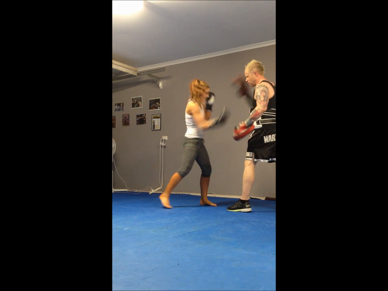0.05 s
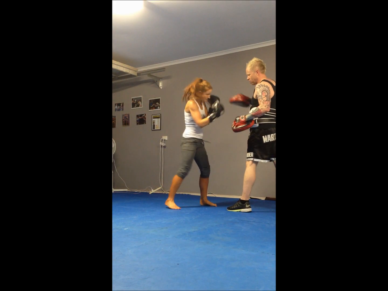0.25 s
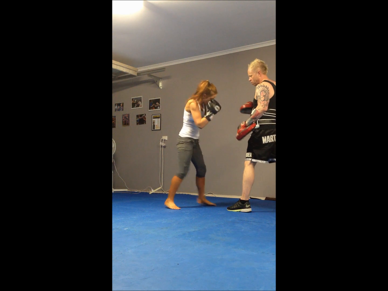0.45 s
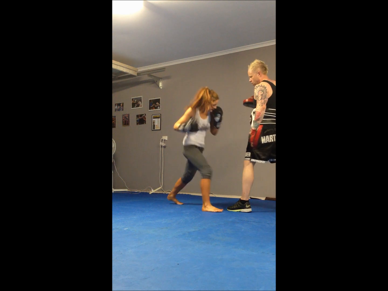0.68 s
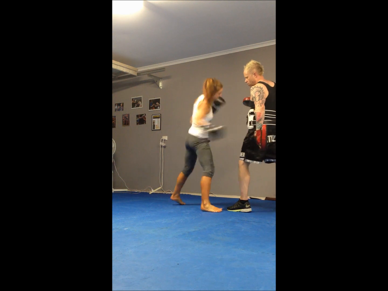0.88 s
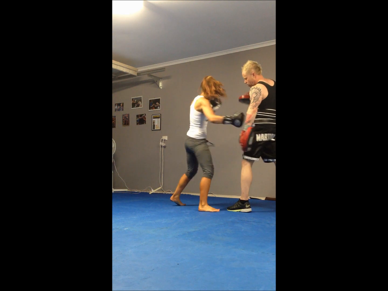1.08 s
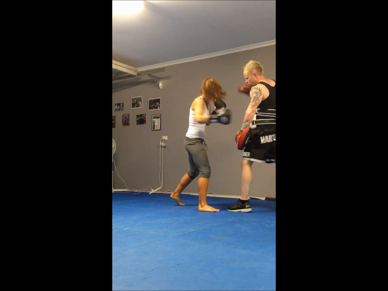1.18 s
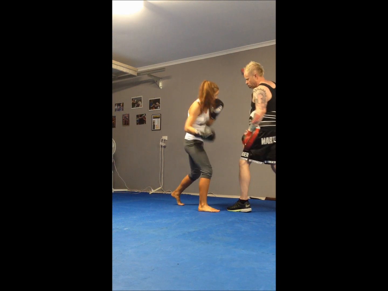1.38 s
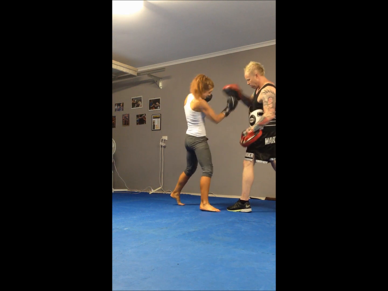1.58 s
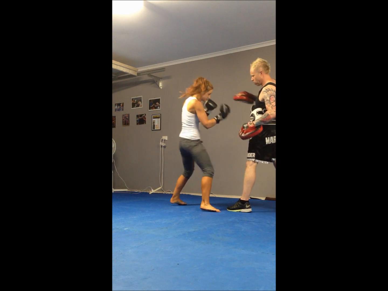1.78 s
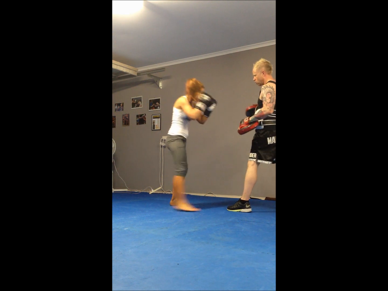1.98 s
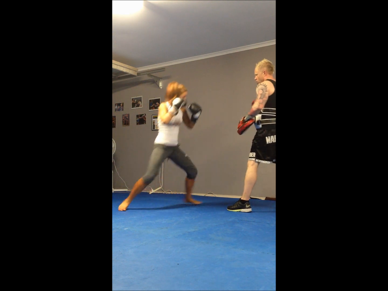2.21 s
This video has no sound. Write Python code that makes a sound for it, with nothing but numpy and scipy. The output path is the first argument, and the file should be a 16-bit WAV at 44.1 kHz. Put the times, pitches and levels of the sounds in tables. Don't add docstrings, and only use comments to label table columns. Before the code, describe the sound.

Boxing gloves smack focus mitts: a hard hit, a faint tap, a softer smack, then a sharp last one. Hard gym walls ring after each, over steady ventilation, caught by a small, slightly hissy phone microphone.

```python
import sys
import numpy as np
from scipy import signal
from scipy.io import wavfile
from scipy.ndimage import uniform_filter1d

SR = 44100
rng = np.random.default_rng(int(sys.argv[2]) if len(sys.argv) > 2 else 0)


def store_pcm(level_fs):
    pcm = np.round(np.clip(level_fs, -1, 1) * 32767).astype(np.int16)
    wavfile.write(sys.argv[1], SR, np.atleast_2d(pcm).T)


def how_loud(loudness_db):
    steps = np.asarray(loudness_db, float) / 20
    return 10 ** steps


N = 99225

# start_s, thud_db, slap_db, snap_db, crack_db
BLOWS = [
    (.2300, -18.5, -16.5, -19.5, -7),
    (.8126, -61, -43, -48, -44),
    (1.0841, -18.5, -24, -20.5, -19),
    (1.6969, -17.5, -21.5, -27, -7),
]
BLOW_HZ = [300, 1300, 3500, 9000]
SLAP_S = [.2301, .2361, .2385, .2445, .2520, .2650, .8127, .8200, .8310, 1.0838, 1.0874, 1.0917, 1.0993,
          1.1128, 1.1260, 1.6955, 1.6966, 1.6976, 1.6994, 1.7052]
# level_db, burst_s
SLAPS = [(0.5, 0.0018), (1.5, 0.00093), (-0.5, 0.0019), (-2, 0.0014), (-5, 0.00086), (-7, 0.0004),
         (2, 0.0027), (-2.5, 0.0039), (-4, 0.0051), (-4.5, 0.0019), (1, 0.0015), (-1.5, 0.00044),
         (-5, 0.00085), (-6.5, 0.0013), (-11, 0.00062), (0, 0.00068), (-.3, 0.0011), (-1, 0.0014),
         (-1, 0.003), (4, 0.00091)]
# pitch_hz, level_db, fade_s (time to fall 60 dB)
FOAM = [(215, 7, .06), (290, 6, .05), (370, 8, .05), (560, -1, .04), (810, -6, .03)]
TAILS = [(-11, -8, -4, -10, -12.5), (-34, -25, -35, -39, -33.5), (-9.5, -12.5, -13.5, -26.5, -22),
         (-11, -9.5, -14, -17.5, -16)]
TAIL_HZ = [400, 1000, 1700, 4400, 9000]


def blow(row, tail_db, boom_db):
    start_s, strengths_db = row[0], row[1:]
    sound = np.zeros(N)
    for slap_s, (level_db, burst_s) in zip(SLAP_S, SLAPS):
        if -.01 < slap_s - start_s < .1:
            add(sound, slap_s, slap(level_db, burst_s))
    add(sound, start_s, how_loud(-20.5) * dying_tones(FOAM, .2))

    def blow_tone(hz):
        lows_db = 4 * np.minimum(np.log2((hz + 10) / 204), 0)
        highs_db = -5.5 * np.maximum(np.log2((hz + 10) / 9000), 0)
        return read(list(zip(BLOW_HZ, strengths_db)), hz) + lows_db + highs_db

    sound = how_loud(17) * colour(sound, blow_tone)
    tail = colour(wall_returns(), lambda hz: read(list(zip(TAIL_HZ, tail_db)), hz))
    add(sound, start_s, how_loud(40) * tail)
    add(sound, start_s, boom(boom_db))
    return sound


def slap(level_db, burst_s):
    t = np.arange(600) / SR
    u = t / 0.0001
    push = -u * (2 - u) * np.exp(1 - u)
    fizz = rng.standard_normal(len(t)) * np.exp(-t / burst_s)
    return how_loud(level_db) * (how_loud(2) * push + how_loud(-2.5) * fizz)


# pitch_hz, width_hz, level_db, fade_s (time to fall 60 dB)
RINGS = [
    (968, 420, -39.5, 0.22),
    (1164, 130, -40, 0.37),
    (1464, 130, -47, 0.5),
    (4240, 1400, -25.5, 0.54),
    (1690, 180, -33.5, 0.62),
    (601, 260, -30, 0.77),
]
RING_S = [.8125, .8125, .8125, 1.7000, 1.0880, .2340]


def mitt_rings():
    mix = np.zeros(N)
    for (hz, width_hz, level_db, fade_s), start_s in zip(RINGS, RING_S):
        since = np.arange(N) / SR - start_s
        rise = np.clip(since / .002, 0, 1)
        fade = how_loud(-60 * np.maximum(since, 0) / fade_s)
        mix += how_loud(10) * hum(hz, width_hz, level_db) * rise * fade
    return mix


# pitch_a_hz, pitch_b_hz, fade_s (time to fall 60 dB)
ROOM_MODES = [(166, 250, 1), (214, 218, 0.61), (278.3, 297, 0.84), (359.6, 372, 0.47), (554, 664, 1)]
BOOMS = [(-31.5, -27.5, -25.5, -19.5, -27), (-65, -68, -63, -43, -45), (-32, -19, -25.5, -26, -33),
         (-27.5, -28.5, -25.5, -24.5, -36)]


def boom(boom_db):
    tones = []
    for (a_hz, b_hz, fade_s), level_db in zip(ROOM_MODES, boom_db):
        tones += [(a_hz, level_db, fade_s), (b_hz, level_db, fade_s)]
    rise_s = 0.0074
    return dying_tones(tones, 1)[:SR] * (1 - np.exp(-np.arange(SR) / SR / rise_s))


# pitch_hz, fade_s (time to fall 60 dB)
ROOM = [(80, 0.27), (170, 0.76), (400, 0.71), (1000, 0.43), (1800, 0.69), (4000, 0.6), (8000, 0.69),
        (14000, 0.3)]
# pitch_hz, level_db
EARLY = [(300, -43), (2000, -52), (4000, 1.5), (8000, 2), (14000, -2)]


def wall_returns():
    delay_s, rise_s, early_fade_s = .0012, 0.0042, 0.033

    def level_db(hz, s):
        late = how_loud(-60 * s / read(ROOM, hz))
        early = how_loud(read(EARLY, hz) - 60 * s / early_fade_s)
        return 10 * np.log10(late ** 2 + early ** 2)

    tail = cloud(SR, level_db, .6)
    since = np.maximum(np.arange(SR) / SR - delay_s, 0)
    return tail / np.linalg.norm(tail) * (1 - np.exp(-since / rise_s))


def room(x):
    return signal.fftconvolve(x, wall_returns())[:len(x)]


# start_s, length_s, level_db, brightness_db (per octave)
SLIDES = [
    (0.976, 0.2, -49, 11),
    (1.199, 0.22, -40, 12),
    (1.82, 0.34, -52, 3),
    (2.076, 0.12, -40, 4),
]


def feet():
    steps = np.zeros(N)
    for start_s, length_s, level_db, brightness_db in SLIDES:
        add(steps, start_s, slide(length_s, level_db, brightness_db))
    return steps + how_loud(-4) * room(steps)


def slide(length_s, level_db, brightness_db):
    top_hz, fall_db, peak = 8360, -8.5, 0.39
    u = np.linspace(0, 1, round(length_s * SR))
    hiss = rng.standard_normal(len(u))
    grain = evened(uniform_filter1d(rng.standard_normal(len(u)), size=60))
    hiss = hiss * how_loud(1.5 * grain)

    def skin_tone(hz):
        slope_db = np.where(hz < top_hz, brightness_db, fall_db)
        return slope_db * np.log2((hz + 1) / top_hz)

    swell = np.sin(np.pi * u ** (np.log(.5) / np.log(peak)))
    return how_loud(level_db + 18) * colour(hiss, skin_tone) * swell


# time_s, level_db
AIR = [(0, -40.5), (.18, -38), (.65, -42), (.95, -39), (1.45, -36.5), (1.65, -34.5), (2.0, -39),
       (2.25, -37.5)]
# pitch_hz, level_db
AIR_TONE = [(60, 2), (250, -7.5), (500, 1.5), (830, 1.5), (1100, -0.5), (1550, 3.1), (4200, -1.3),
            (9000, -8)]
# pitch_hz, width_hz, level_db
AIR_HUM = [(208, 23, -20), (256, 33, -18.5), (678, 127, -13.5), (827, 29, -12), (1371, 66, -14),
           (1575, 180, -9)]


def air():
    t = np.arange(N) / SR
    waver = np.zeros(N)
    for hz in np.geomspace(2, 20, 20):
        waver += np.sin(2 * np.pi * (hz * t + rng.random())) / np.sqrt(hz)
    wash = evened(cloud(N, lambda hz, s: read(AIR_TONE, hz) + 0 * s, 0.5))
    for row in AIR_HUM:
        wash = wash + hum(*row)
    return wash * how_loud(7 + np.interp(t, *np.transpose(AIR)) - 1.68 * evened(waver))


# pitch_hz, level_db
HISS = [(300, -51), (3000, -55), (8000, -46.5), (15000, -51)]


def microphone_hiss():
    return colour(rng.standard_normal(N), lambda hz: read(HISS, hz) + 10)


def hum(hz, width_hz, level_db):
    r = np.exp(-np.pi * width_hz / SR)
    slow = signal.lfilter([1], [1, -2 * r, r * r], rng.standard_normal((2, N)), axis=1)
    carrier = np.exp(2j * np.pi * hz * np.arange(N) / SR)
    return how_loud(level_db) * evened(((slow[0] + 1j * slow[1]) * carrier).real)


def dying_tones(tones, length_s):
    t = np.arange(0, length_s, 1 / SR)
    mix = np.zeros(len(t))
    for hz, level_db, fade_s in tones:
        pitch_hz = hz * rng.uniform(.995, 1.005)
        mix += how_loud(level_db - 60 * t / fade_s) * np.sin(2 * np.pi * pitch_hz * t)
    return mix


def cloud(size, db_at, patch_db):
    frames = size // 128 + 5
    hz = np.fft.rfftfreq(512, 1 / SR)[:, None]
    a, b, patches = rng.standard_normal((frames, 257, 3)).T
    patches = uniform_filter1d(patches, size=5, axis=0)
    patches = evened(uniform_filter1d(patches, size=16, axis=1))
    level_db = db_at(hz, np.arange(frames) * 128 / SR) + patch_db * patches
    return signal.istft((a + 1j * b) * how_loud(level_db), nperseg=512, noverlap=384)[1][:size]


def colour(x, db_at):
    log = np.log(how_loud(db_at(abs(np.fft.fftfreq(8192, 1 / SR)))))
    taps = np.fft.ifft(np.exp(log - 1j * signal.hilbert(log).imag)).real[:4096]
    return signal.oaconvolve(x, taps)[:len(x)]


def read(points, hz):
    f, value = np.transpose(points)
    return np.interp(np.log(hz + 1), np.log(f + 1), value)


def evened(x):
    return x / np.sqrt(np.mean(x ** 2) + 1e-20)


def add(mix, start_s, sound):
    part = mix[round(start_s * SR):][:len(sound)]
    part += sound[:len(part)]


def scene():
    blows = sum(map(blow, BLOWS, TAILS, BOOMS))
    return (blows + mitt_rings() + feet() + air() + microphone_hiss())[None]


def band_limit(x):
    return signal.sosfilt(signal.butter(12, 16460, fs=SR, output="sos"), x)


# pitch_hz, level_db
MIC_LOW = [(30, -33), (90, -24.5), (140, -10.5), (210, -3), (370, 0.95), (500, -4), (1050, -6.5),
           (1600, -6)]
# pitch_hz, level_db
MIC_HIGH = [(2000, -1.3), (4500, 2.68), (5100, -5.5), (6200, -3.5), (8200, 1.5), (9100, -5), (9900, -7.5),
            (15000, -9)]


def record(dry):
    x = colour(dry[0], lambda hz: read(MIC_LOW, hz) + read(MIC_HIGH, hz))
    knee = 2.8
    x = np.clip(knee * np.tanh(x / knee), -.84, .84)
    low_pass = signal.firwin(511, 15330, window=("kaiser", 9), fs=SR)
    x = signal.oaconvolve(x, low_pass, "same")
    return band_limit(x[None])


dry = scene()
out = record(dry)
store_pcm(out)
```